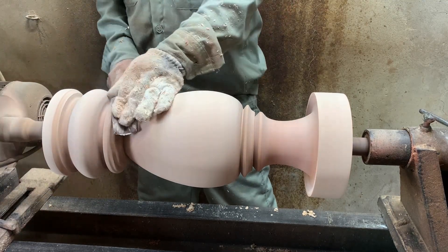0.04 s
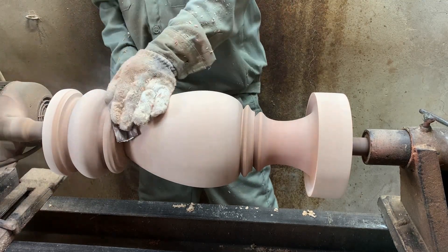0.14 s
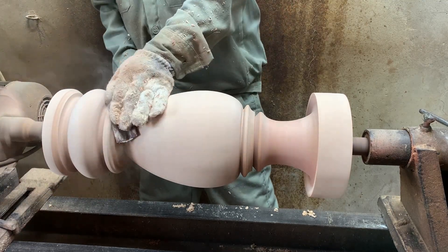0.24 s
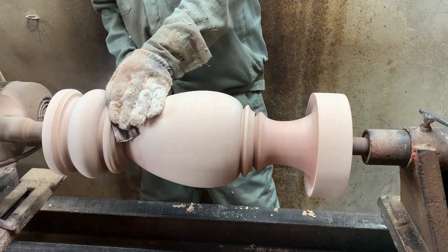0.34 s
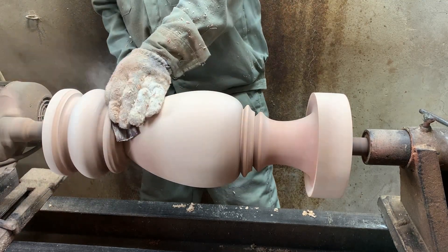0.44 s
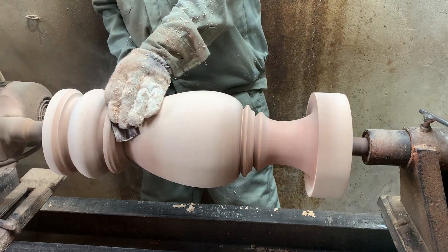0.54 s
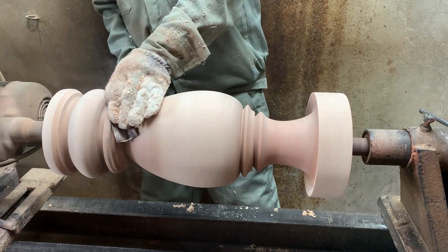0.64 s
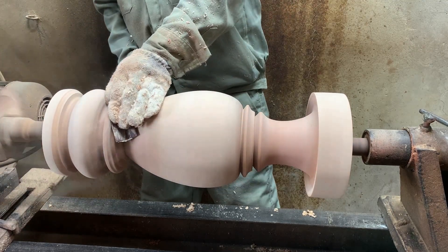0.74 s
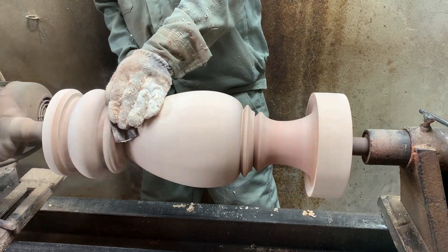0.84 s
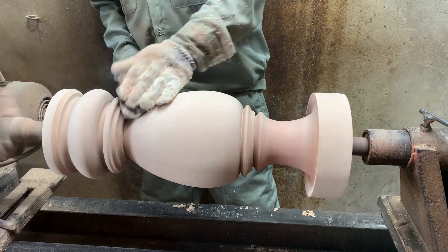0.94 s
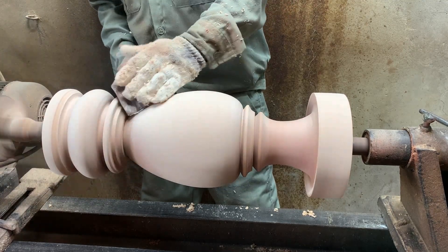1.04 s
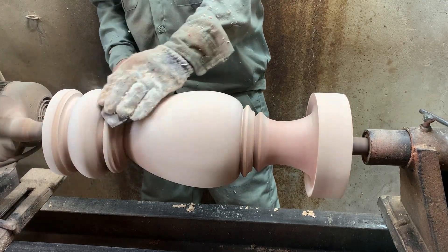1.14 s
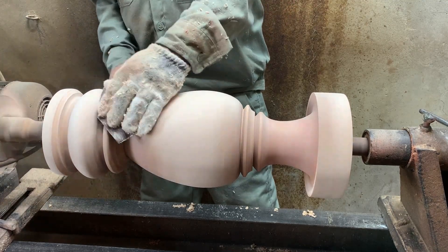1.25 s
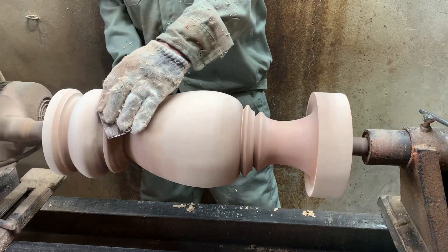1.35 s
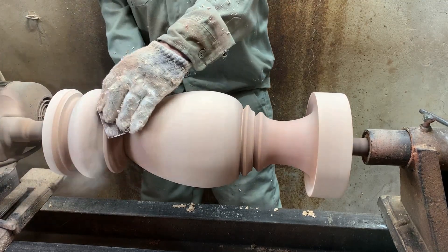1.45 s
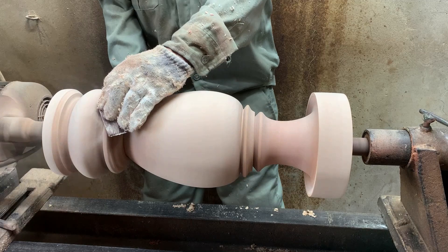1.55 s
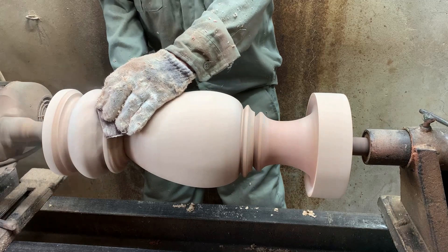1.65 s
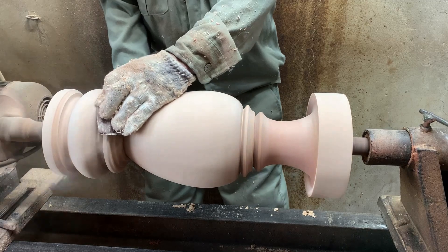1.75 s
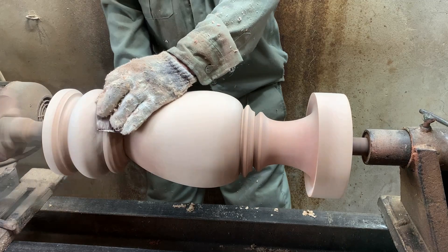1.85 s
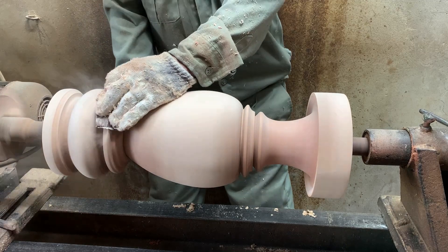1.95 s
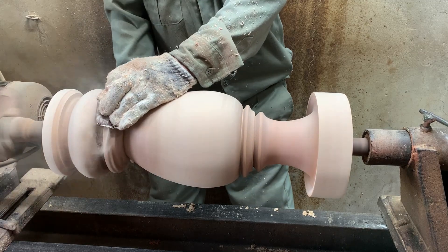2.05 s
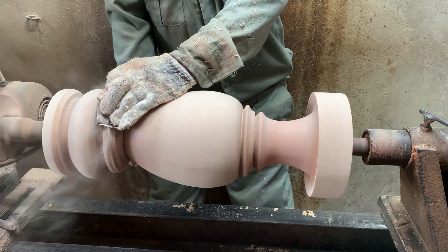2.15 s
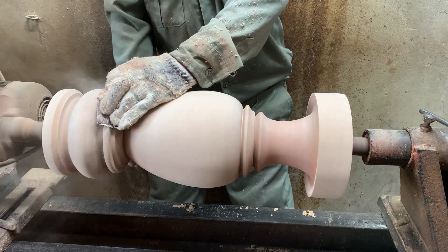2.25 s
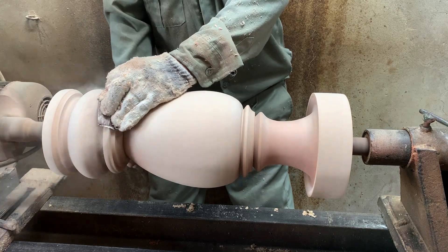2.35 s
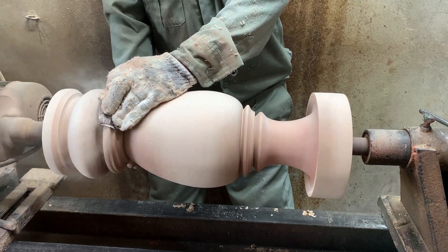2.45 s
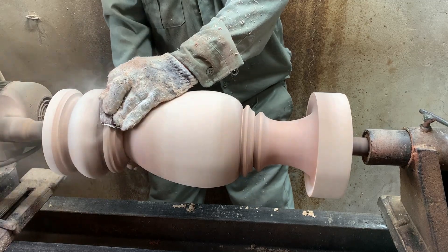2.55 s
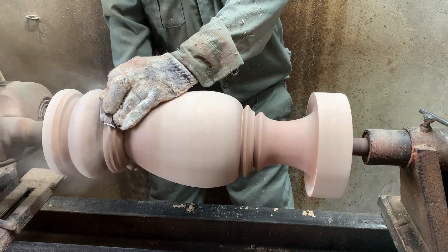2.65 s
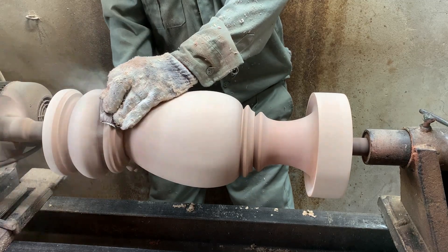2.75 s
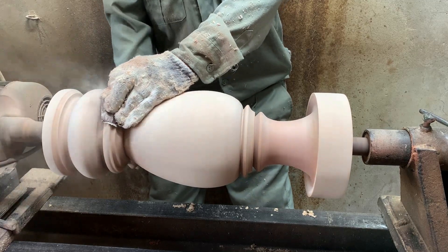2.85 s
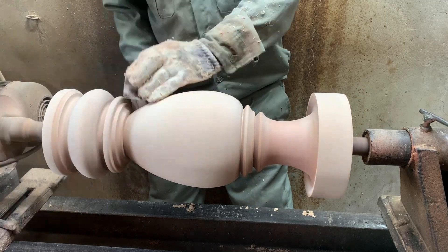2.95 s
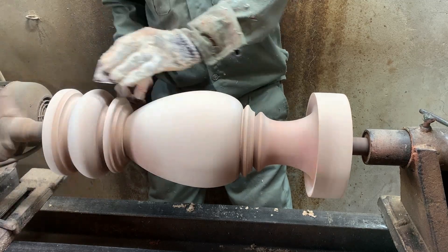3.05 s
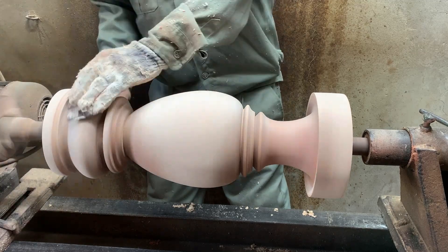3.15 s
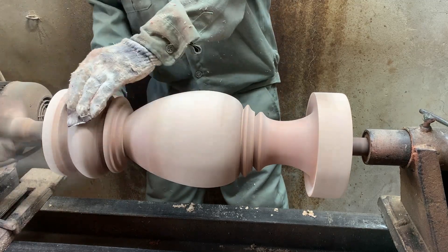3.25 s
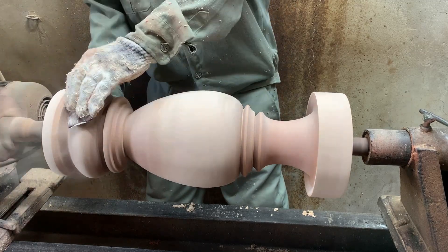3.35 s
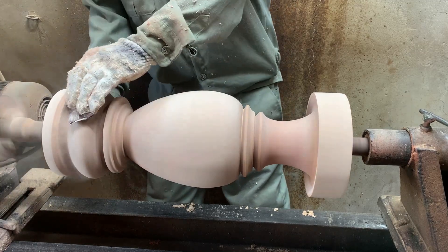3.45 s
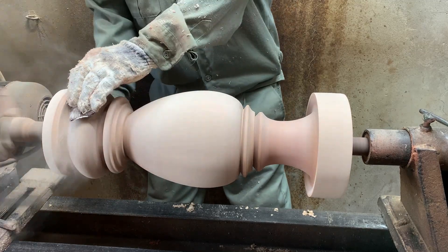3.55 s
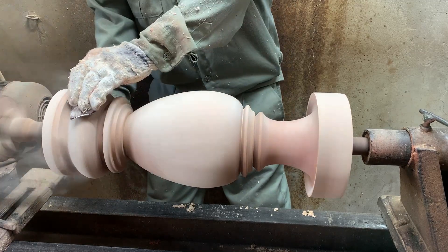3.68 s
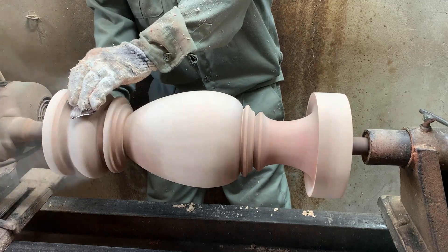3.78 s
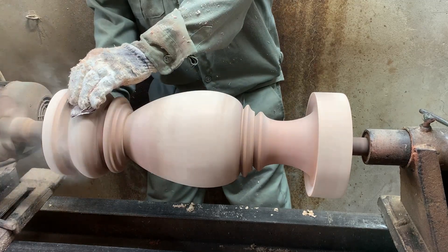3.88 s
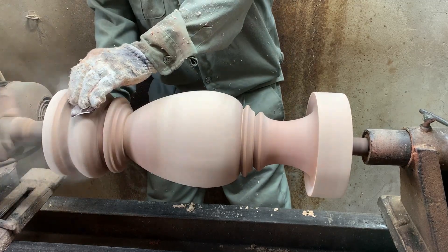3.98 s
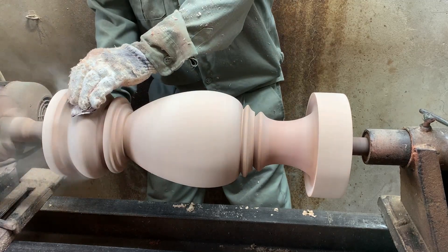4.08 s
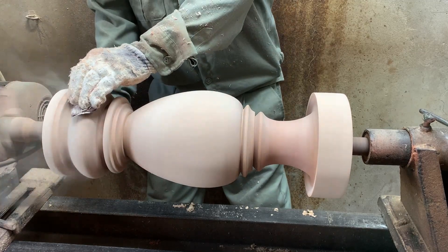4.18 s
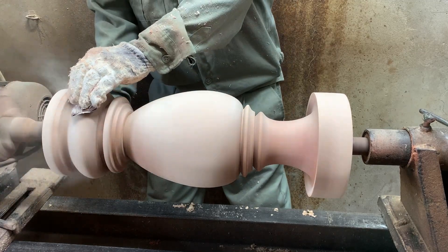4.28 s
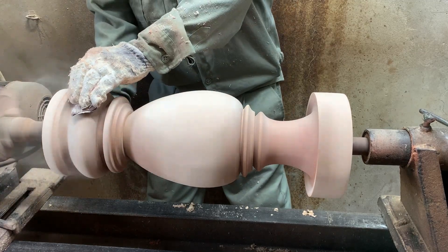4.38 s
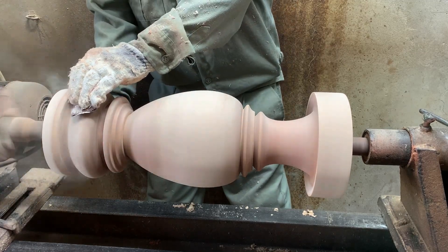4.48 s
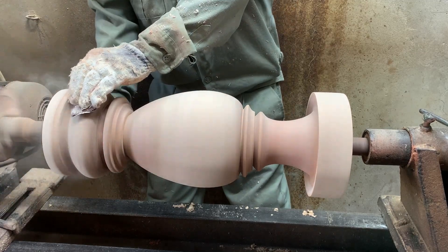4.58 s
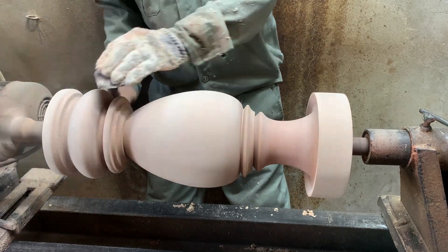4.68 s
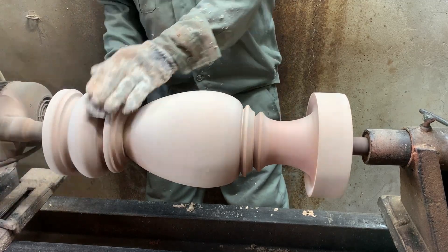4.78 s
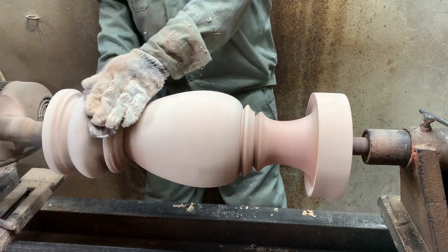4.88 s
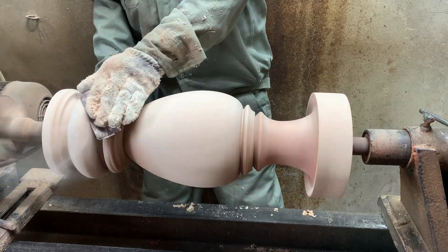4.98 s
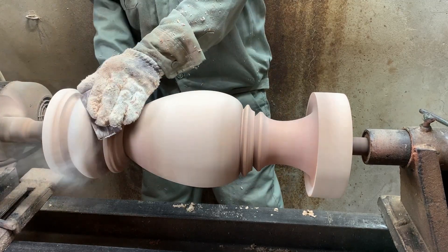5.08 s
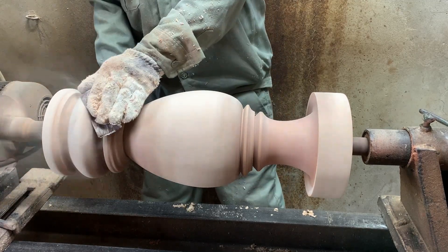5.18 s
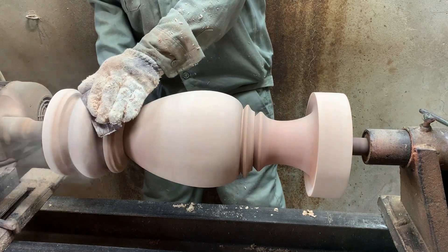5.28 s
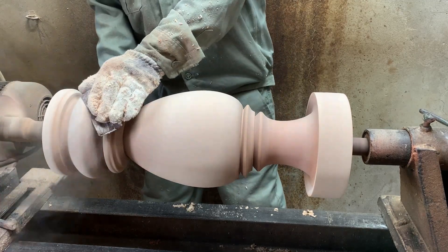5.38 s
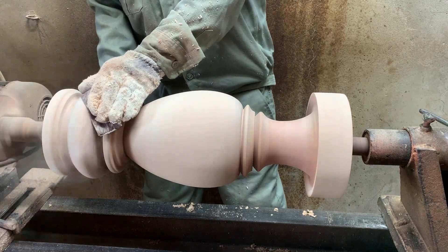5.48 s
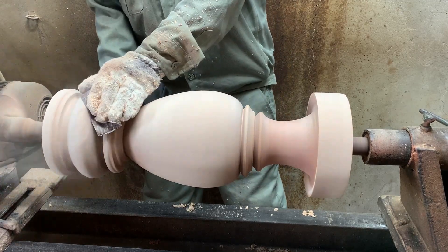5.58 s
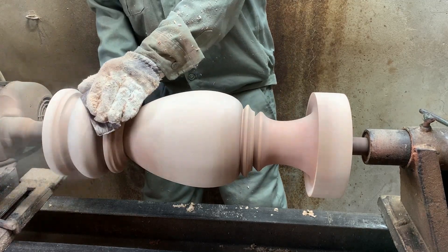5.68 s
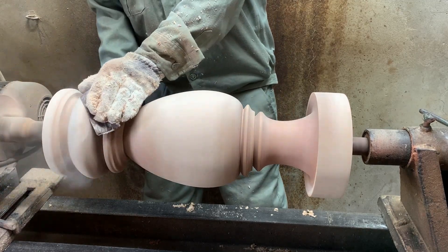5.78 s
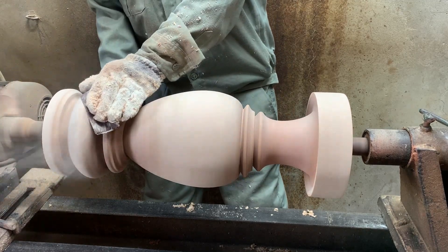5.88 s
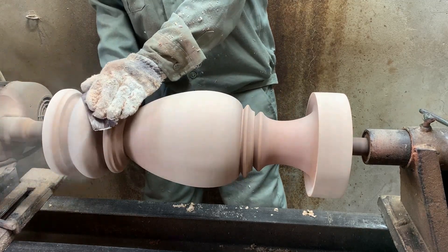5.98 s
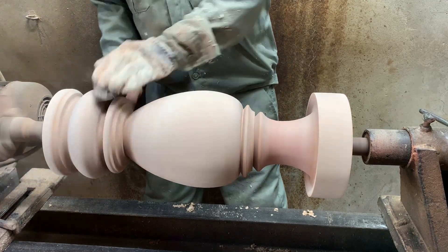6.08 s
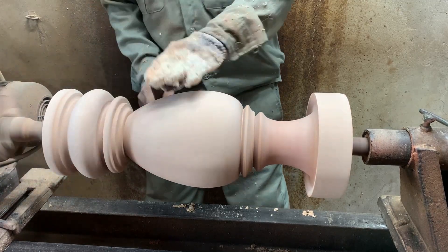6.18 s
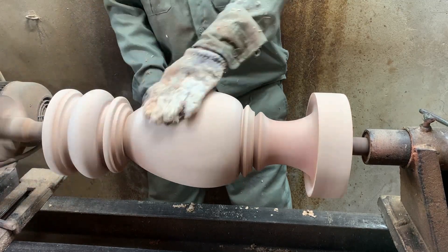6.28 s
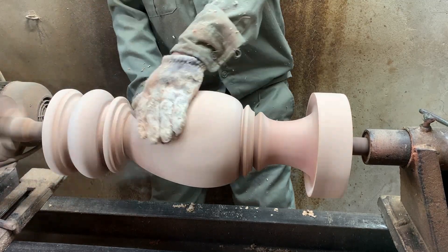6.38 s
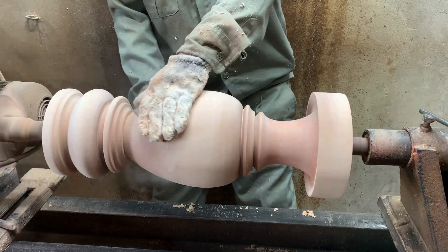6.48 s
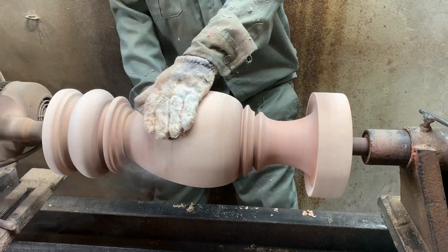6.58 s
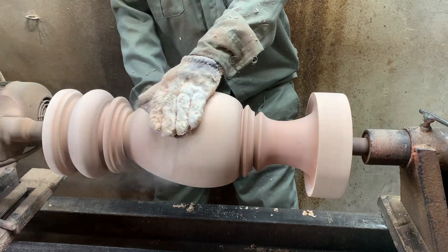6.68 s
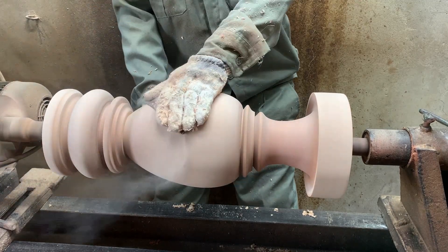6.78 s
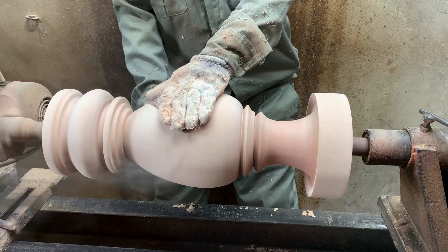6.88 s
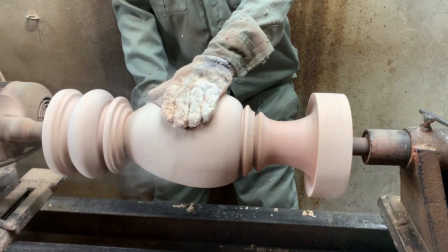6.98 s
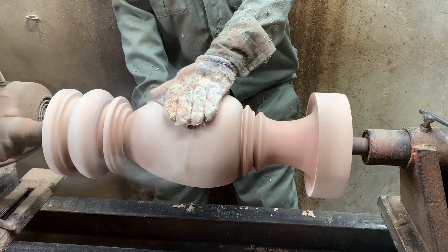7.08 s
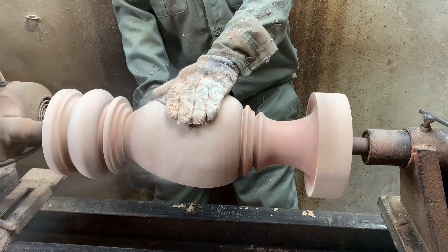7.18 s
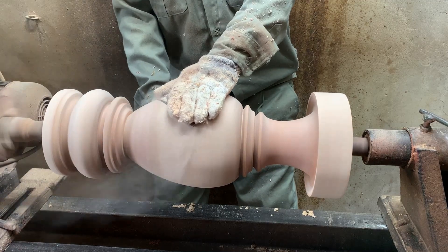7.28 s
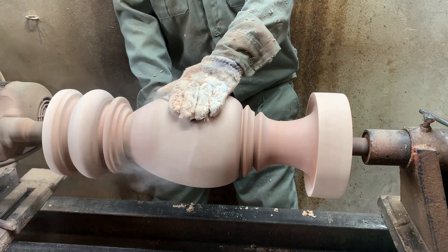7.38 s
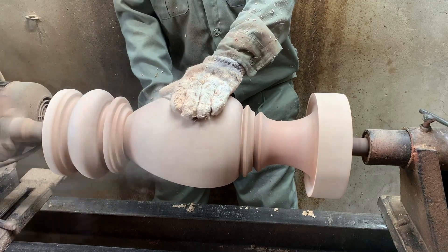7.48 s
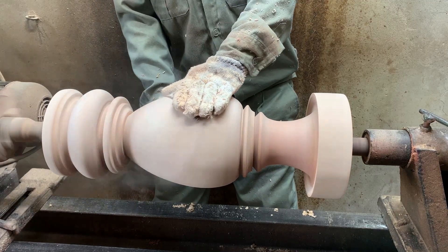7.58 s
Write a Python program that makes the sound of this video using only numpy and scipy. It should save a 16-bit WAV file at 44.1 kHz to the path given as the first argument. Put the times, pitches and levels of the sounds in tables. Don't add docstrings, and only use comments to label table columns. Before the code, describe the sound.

Close workshop sanding: dense gritty rushing with short lifts, a fast fluttering metallic rumble beneath, scattered sharp paper snags, and soft wind thumps.

```python
import sys
import numpy as np
from scipy import signal
from scipy.fft import rfft, irfft, next_fast_len
from scipy.io import wavfile
from scipy.ndimage import uniform_filter1d, map_coordinates

SR = 44100
rng = np.random.default_rng(int(sys.argv[2]) if len(sys.argv) > 2 else 0)


def gain_from_db(level_db):
    decades = np.asarray(level_db, float) / 20
    return 10 ** decades


def transcribe(u):
    v = np.clip(np.atleast_2d(u).T, -1, 1)
    q = np.round(v * 32767).astype(np.int16)
    wavfile.write(sys.argv[1], SR, q)


N = 336473
T = np.arange(N) / SR


def unit(x):
    return x / np.sqrt(np.mean(x ** 2) + 1e-20)


def along(points, hz):
    f, v = np.transpose(points)
    return np.interp(np.log(hz + 1), np.log(f + 1), v)


def curves(rows, t=T):
    s, *cols = np.transpose(rows)
    return [np.interp(t, s, c) for c in cols]


def wobble(rate):
    knots = rng.standard_normal(int(N * rate / SR) + 4)
    return map_coordinates(knots, [T * rate])


def filtered(x, response):
    m = next_fast_len(N + 8192)
    spectrum = rfft(x, m) * response(np.fft.rfftfreq(m, 1 / SR))
    return irfft(spectrum, m)[..., :N]


def modes(table):
    def response(f):
        total = 0
        for k, (centre, width, db) in enumerate(table):
            damping = 1j * f * width
            total = total + (-1) ** k * gain_from_db(db) * damping / (centre * centre - f * f + damping)
        return total
    return response


def pair(gate=1):
    return gate * rng.standard_normal((2, N))


def singing(hz, wander_hz, rate):
    pitch_hz = [hz + wander_hz * wobble(rate) for _ in "LR"]
    return np.sqrt(2) * np.cos(2 * np.pi * np.cumsum(pitch_hz, axis=1) / SR)


# pitch_hz, density_db (per Hz)
WHIRR = [(1400, -43), (1600, -5.5), (2500, -7), (4000, -14.5), (5000, -16), (6200, -20.5), (7000, -20),
         (8500, -32.5), (10000, -39), (11000, -60)]
# pitch_hz, width_hz, level_db
WHISTLE = [(12030, 60, -81), (12680, 60, -82), (11400, 60, -86), (13250, 30, -92), (5900, 93, -63),
           (6600, 56, -65), (5360, 50, -68)]
# time_s, level_db
IDLE = [
    (1.1, -44.5),
    (3.08, -51),
    (4.8, -46.5),
    (6.25, -49.5),
]
CARRIER_HZ, CARRIER_DB = 12030, -68


def drive():
    whirr = unit(filtered(pair(gain_from_db(0.58 * wobble(25))), lambda f: gain_from_db(along(WHIRR, f)) * (f < 11500)))
    murmur = filtered(pair(), lambda f: gain_from_db(-31 - 1.6 * np.log2(f / 800 + .06)) * (f > 250) * (f < 1600))
    whistles = 0
    for hz, width, db in WHISTLE:
        whistles = whistles + gain_from_db(db) * unit(filtered(pair(), lambda f: np.exp(-((f - hz) / width) ** 2)))
    carrier = gain_from_db(CARRIER_DB) * singing(CARRIER_HZ, wander_hz=9, rate=25)
    return gain_from_db(curves(IDLE)[0]) * whirr + murmur + whistles + carrier


# pitch_hz, density_db (per Hz)
GUST = [(15, -8), (30, -7.5), (90, -0.5), (170, -3), (300, -11.5), (600, -16.5), (1200, -52), (3000, -120)]
# start_s, peak_db, length_s, puff_hz
GUSTS = [(0.028, -33, 0.2, 178), (0.358, -29, 0.065, 108), (0.565, -40, .03, 110), (0.855, -36, 0.053, 113),
         (0.987, -48, 0.037, 61.9), (1.09, -31, 0.19, 110), (1.27, -27, 0.1, 120), (1.58, -35, 0.093, 172),
         (1.831, -40, 0.035, 135), (1.939, -32.5, 0.04, 100), (2.043, -31, 0.058, 137),
         (2.19, -37, 0.033, 90), (2.562, -34, 0.028, 117), (2.898, -35, 0.091, 67.3),
         (3.2, -28.5, 0.035, 59.2), (3.31, -29, .08, 105), (3.512, -36, 0.078, 100),
         (3.641, -28, 0.11, 110), (3.998, -32.5, 0.093, 102), (4.124, -34, 0.061, 96.9),
         (4.242, -32, 0.12, 110), (4.679, -36.5, 0.18, 110), (4.747, -36, 0.051, 194),
         (5.089, -30, 0.056, 96.9), (5.239, -33, 0.062, 70.0), (5.446, -27.5, 0.1, 170),
         (6.016, -29, 0.075, 172), (6.285, -37, .12, 100), (7.077, -31, 0.065, 83.4),
         (7.395, -36, 0.23, 80)]
CALM_DB, CALM_SWING_DB = -43, 2
GUST_PEAK_S, PUFF_DB = 0.022, 7


def buffet():
    lumps = gain_from_db(3 * wobble(40) + 2.6 * wobble(110))
    level = gain_from_db(CALM_DB + CALM_SWING_DB * wobble(11))
    for s, db, length, _ in GUSTS:
        level = level + gain_from_db(db - 14 * np.abs(T - s - GUST_PEAK_S) / length)
    return level * unit(filtered(pair(lumps), lambda f: gain_from_db(along(GUST, f))))


def thumps():
    out, t = np.zeros((2, N + SR)), np.arange(2200) / SR
    fade = np.hanning(2 * len(t))[len(t):]
    phases = rng.uniform(0, 2 * np.pi, (len(GUSTS), 2, 1))
    for (s, db, _, hz), phase in zip(GUSTS, phases):
        swings = t * hz / 0.63
        swell = 4 * swings ** 2 * np.exp(-2 * swings) * fade
        out[:, round(s * SR):][:, :len(t)] += gain_from_db(db + PUFF_DB) * swell * np.cos(2 * np.pi * hz * t + phase)
    return out[:, :N]


# start_s, peak_db
TICK = [
    (4.8174, -20),
]


def tick():
    out, t = np.zeros((2, N)), np.arange(120) / SR
    for s, db in TICK:
        click = rng.standard_normal((2, len(t))) * gain_from_db(-60 * t / 0.0013)
        push = 2.2 * np.sin(2 * np.pi * 900 * t) * gain_from_db(-60 * t / .004)
        out[:, round(s * SR):][:, :len(t)] += gain_from_db(db - 8) * (click + push)
    return out


def beads(hz, turns, scatter_db, drift):
    count = np.floor(turns + .5).astype(int)
    draws = rng.standard_normal((count.max() + 1, 4))
    size_db = scatter_db * (draws[:, :1] + 1.1 * draws[:, 1:2] * [1, -1])
    phase = uniform_filter1d(np.cumsum(drift * draws[:, 2:], axis=0)[count], size=200, axis=0)
    size = gain_from_db(uniform_filter1d(size_db[count], size=200, axis=0))
    ring = (size * np.cos(2 * np.pi * hz * T[:, None] + phase)).T
    return filtered(ring, lambda f: np.exp(-((f - hz) / 600) ** 2))


# pitch_hz, width_hz, level_db
HEADSTOCK = [(1356, 95, 28), (1280, 110, -25)]
# pitch_hz, width_hz, level_db
BED = [(638, 80, -2), (409, 44, -3.5), (478, 66, -21.5)]
# time_s, headstock_db
LOAD = [(0.0, -43.5), (0.13, -33), (0.91, -35), (1.23, -39.5), (1.27, -35), (1.59, -35), (2.42, -31),
        (2.87, -33.5), (3.01, -47), (3.51, -31), (3.78, -35.5), (3.8, -28.5), (4.57, -34), (4.76, -42.5),
        (5.84, -34.5), (6.31, -45), (6.5, -37), (7.63, -35)]
# start_s, lead_turns (after the slip), creep_turns (until the next)
SLIPS = [(0, .34, .1), (.82, .83, .2), (1.81, .73, -.23), (2.81, .82, .12), (3.82, .49, -.04),
         (4.82, .85, .07), (5.82, .58, .3), (6.81, 1.18, .12)]
# time_s, lead_turns
BALL_SLIP = [(0, .33), (.8, .37), (1.3, .15), (2.1, .22), (2.6, .5), (3.4, .33), (4.2, .72), (5.2, .56),
             (6, .62), (7.1, .4), (7.63, .43)]
THROB_HZ, BALL_HZ, SLIP_S = 37.6, 116.6, .025
BED_DB, BED_FOLLOWS = -35.5, 0.55
SURGE_DB = .7


def lathe():
    load_db, = curves(LOAD)
    head_db = load_db + SURGE_DB * wobble(7)
    bed_db = BED_DB + BED_FOLLOWS * (load_db - load_db.mean()) + SURGE_DB * wobble(7)

    ends = [s for s, *_ in SLIPS[1:]] + [N / SR]
    lead = []
    for (s, at, creep), end in zip(SLIPS, ends):
        lead += [(s + SLIP_S, at), (end - SLIP_S, at + creep)]
    turns = THROB_HZ * T + curves(lead)[0]
    throb = 2 * np.pi * turns
    balls = np.cos(2 * np.pi * (BALL_HZ * T + curves(BALL_SLIP)[0]))

    blows = gain_from_db(5 * np.cos(throb + .7) + 4 * balls + wobble(30))
    skirt = modes([(1200, 116, 0)])
    rattle = unit(filtered(pair(blows), lambda f: modes(HEADSTOCK)(f) * skirt(f)))
    tone_gate = gain_from_db(6.5 * np.cos(throb) + 2.2 * balls)
    tone = unit(tone_gate * beads(1311, turns, scatter_db=1.6, drift=2.8))

    bed_body = modes([(560, 420, 0)])
    rumble_gate = gain_from_db(1.65 * np.cos(throb + 0.32))
    rumble = unit(filtered(pair(rumble_gate), lambda f: modes(BED)(f) * bed_body(f)))
    hum = unit(gain_from_db(0.66 * np.cos(throb - .3)) * beads(634, turns, scatter_db=1.0, drift=2.95))
    return gain_from_db(head_db) * (0.65 * rattle + 0.85 * tone) + gain_from_db(bed_db) * (0.9 * rumble + 0.62 * hum)


# start_s, peak_db, pitch_hz
CATCHES = [
    (1.3594, -28, 4000),
    (1.3944, -31, 3810),
    (1.5944, -22, 3500),
    (1.6394, -29, 3650),
    (1.7057, -19, 3230),
    (1.7489, -19.5, 3450),
    (1.9819, -21, 4080),
    (3.9985, -24, 4310),
    (4.8708, -37, 3860),
    (6.1754, -51, 2210),
]


def catches():
    out, t = np.zeros((2, N + SR)), np.arange(900) / SR
    envelope = gain_from_db(-60 * t / 0.018) * np.minimum(t / 0.0022, 1)
    for s, db, hz in CATCHES:
        scrape = rng.standard_normal((2, len(t))) * envelope
        paper = signal.butter(1, [hz * 1.1, hz * 1.14], "band", fs=SR, output="sos")
        ring = signal.sosfilt(paper, scrape)
        out[:, round(s * SR):][:, :len(t)] += gain_from_db(db + 5.5) * ring / np.abs(ring).max()
    return out[:, :N]


# time_s, hiss_db (pressure), bite_db (paper's edge)
STROKES = [
    [(0.012, -44.5, 2.5), (0.125, -39, 3), (0.26, -38.5, 0), (0.38, -40, 1), (0.66, -40.5, 1),
     (0.82, -40, 0), (0.965, -41, 1.5), (0.995, -44.5, -5)],
    [(1.185, -40, -4), (1.26, -34, -1), (1.345, -33.5, 2.5), (1.5, -34, 0.5), (1.68, -35, 5),
     (1.9, -33.5, 1), (2.5, -32, -2), (2.87, -33, -2), (2.945, -40, -2)],
    [(3.18, -42.5, -11), (3.21, -35.5, -3.5), (3.36, -33.5, -3), (3.6, -34, 2.5), (3.7, -35, 0.5),
     (4.1, -32.5, 0), (4.63, -33, 0.5), (4.685, -39, -2)],
    [(4.875, -43.5, 6), (4.9, -34.5, -6), (4.98, -34, -1.5), (5.2, -33.5, -0.5), (5.55, -33.5, -0.5),
     (5.8, -34, -1), (5.95, -34.5, 2), (6.12, -38.5, -0.5)],
    [(6.317, -51, 5), (6.375, -41, 3), (6.47, -35.5, 4.5), (6.55, -34, 0.5), (6.82, -33, 0),
     (7.07, -32, -2.5), (7.628, -33, 0.5)],
]
# rasp_db, flutter_db, fizz_db
GRIPS = [
    (7, 1.5, 4.5),
    (7.5, 3.5, -0.5),
    (8, 2, -0.2),
    (3, -0.5, 0.5),
    (3.5, -1.2, -1),
]
# rasp_db, flutter_db, fizz_db
BITE_MOVES = [1.1, 0.8, 0.2]
ZONES_HZ = [6150, 2140, 3960, 9300]
# pitch_hz, density_db (per Hz)
GRIT = [(900, -22.5), (1500, -10), (2500, -7), (3900, 1.5), (6300, 2), (7500, 0.5), (8600, -6),
        (9000, -7.5), (10500, -13), (12500, -14), (15500, -26.5)]
LAND_S, LIFT_S, LIFT_DB = .01, 0.056, -22.5
GONE_S, OFF_DB = .04, -110
FIDGET_DB, FIDGET_RATE = .7, 11
FIZZ_LEADS_S = 0.0059


def sanding():
    grains = gain_from_db(0.9 * wobble(700) + 0.45 * wobble(60) + 0.15 * wobble(12))
    hz, t, z = signal.stft(pair(grains), SR, nperseg=256)

    contact = []
    for stroke in STROKES:
        (first_s, first_db, first_bite), (last_s, last_db, _) = stroke[0], stroke[-1]
        contact += [(first_s - LAND_S - GONE_S / 10, OFF_DB, 0),
                    (first_s - LAND_S, first_db + LIFT_DB, first_bite), *stroke,
                    (last_s + LIFT_S, last_db + LIFT_DB, 0), (last_s + LIFT_S + GONE_S, OFF_DB, 0)]
    hiss_db, bite_db = curves(contact, t)

    regrips_s = [stroke[0][0] - LAND_S - GONE_S for stroke in STROKES[1:]]
    grip_db = np.transpose(GRIPS)[:, np.searchsorted(regrips_s, t)]
    grip_db[2] += np.clip(FIZZ_LEADS_S * np.gradient(hiss_db, t), -12, 12)
    at = np.minimum(t * SR, N - 1).astype(int)
    fidget_db = FIDGET_DB * np.array([wobble(FIDGET_RATE)[at] for _ in ZONES_HZ])
    shift_db = fidget_db + np.vstack([0 * t, grip_db + np.outer(BITE_MOVES, bite_db)])

    order, centres = np.argsort(ZONES_HZ), np.log(np.sort(ZONES_HZ))
    weights = np.array([np.interp(np.log(hz + 1), centres, order == k) for k in range(4)])
    patches = uniform_filter1d(rng.standard_normal(z.shape[1:]), size=5, axis=0)
    patches = uniform_filter1d(patches, size=14, axis=1)
    gain_db = along(GRIT, hz)[:, None] + weights.T @ shift_db + hiss_db + 1.2 * unit(patches) + 10.0
    return signal.istft(z * gain_from_db(gain_db), SR, nperseg=256)[1][:, :N]


def scene():
    air = buffet() + thumps()
    machine = drive() + lathe() * gain_from_db([[-.1], [.1]])
    return machine + air + tick() + catches() + sanding()


# pitch_hz, gain_db
RIGHT_PORT = [(6000, 0.5), (7850, 1.5), (8050, 18), (8500, 15), (9200, 10.5), (10000, 7), (10800, 2)]


def right_port(x):
    return filtered(x, lambda f: gain_from_db(along(RIGHT_PORT, f)))


def band_limit(x):
    return signal.sosfilt(signal.butter(12, 15730, fs=SR, output="sos"), x)


def record(dry):
    left, right = dry
    return band_limit(np.array([left, right_port(right)]))


dry = scene()
out = record(dry)
transcribe(out)
```